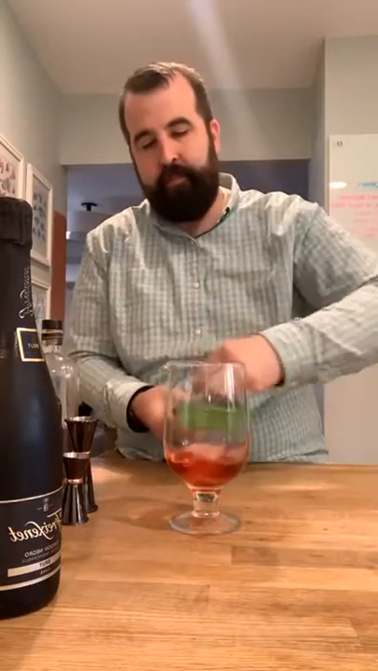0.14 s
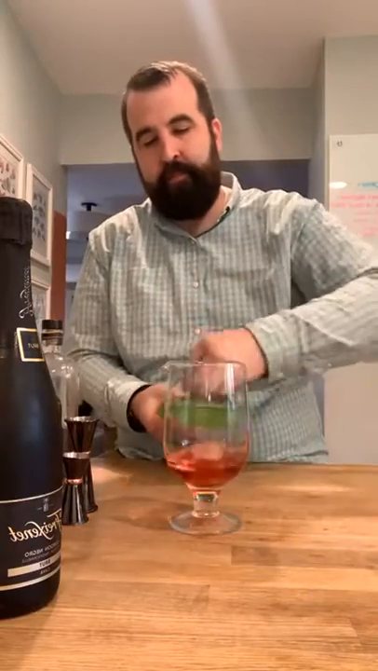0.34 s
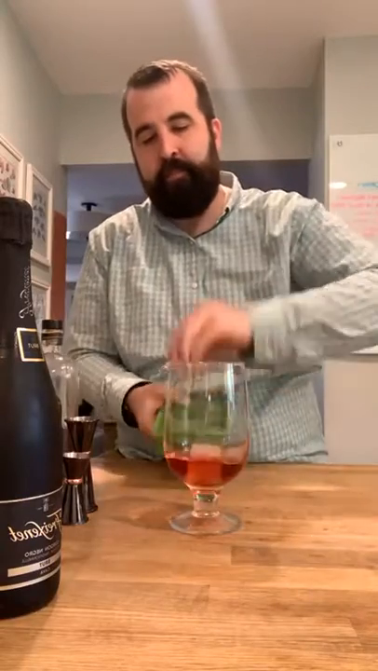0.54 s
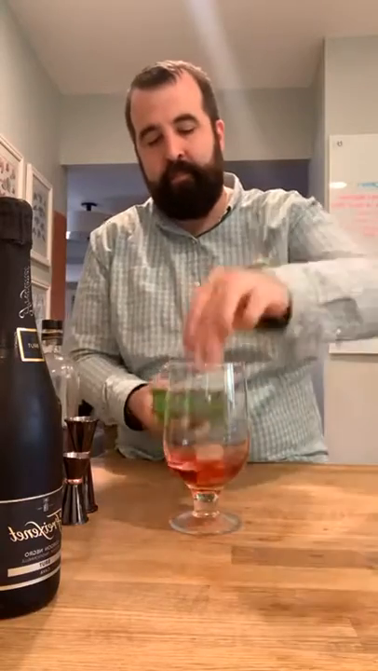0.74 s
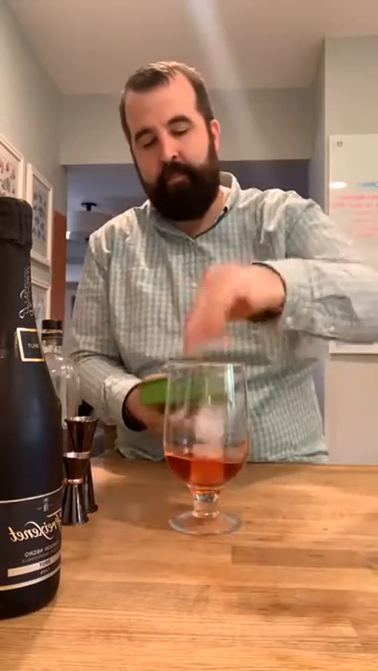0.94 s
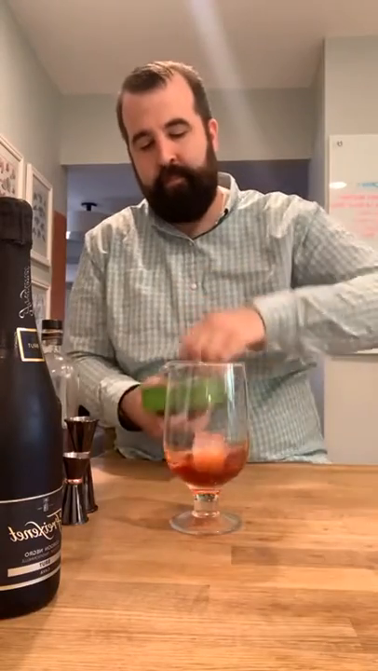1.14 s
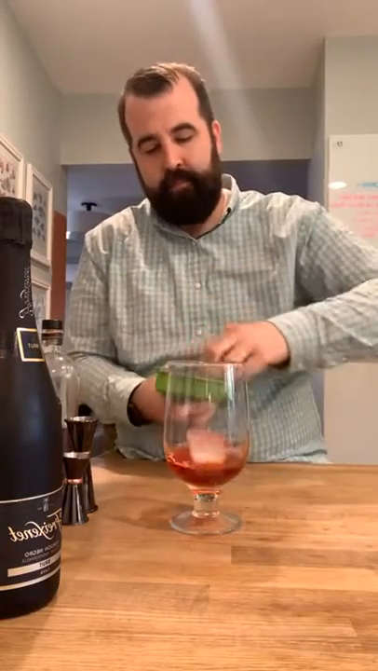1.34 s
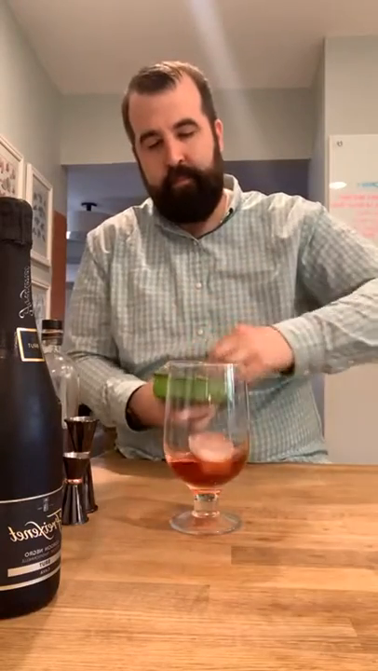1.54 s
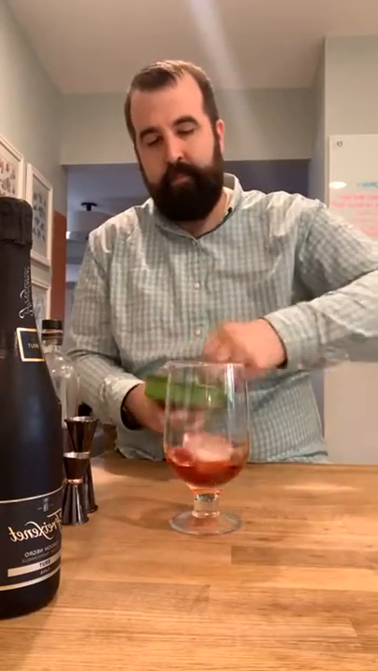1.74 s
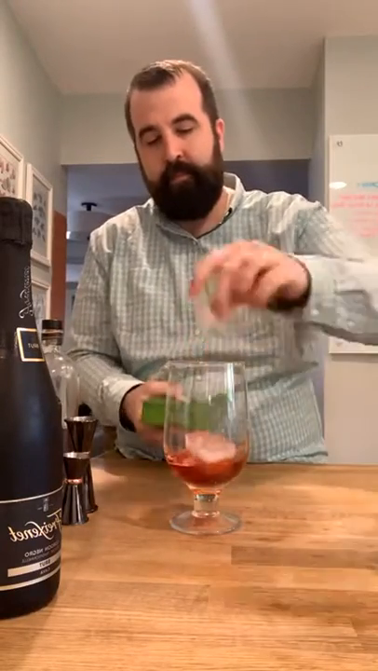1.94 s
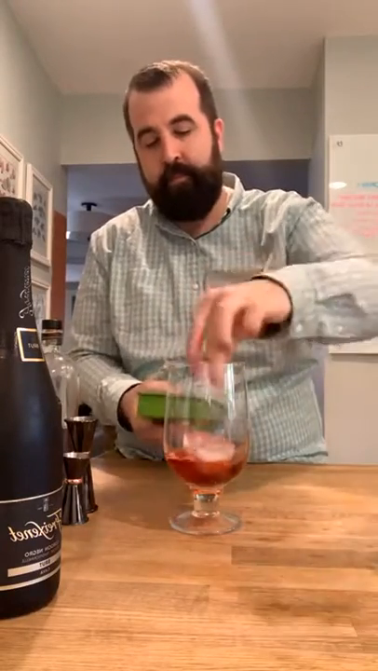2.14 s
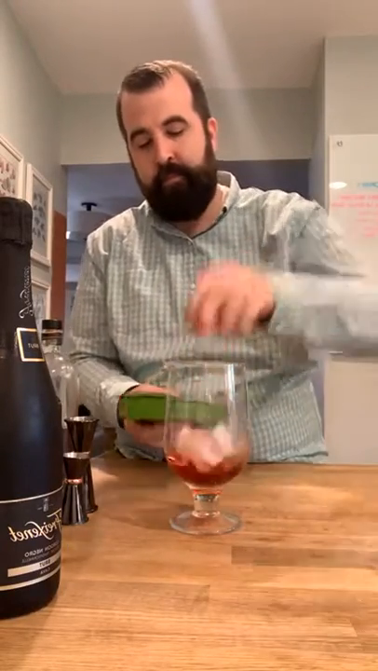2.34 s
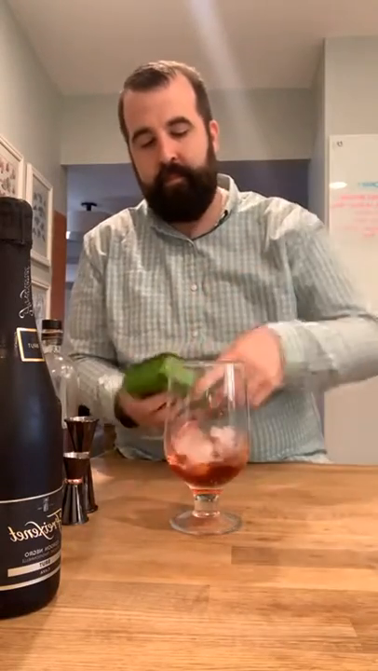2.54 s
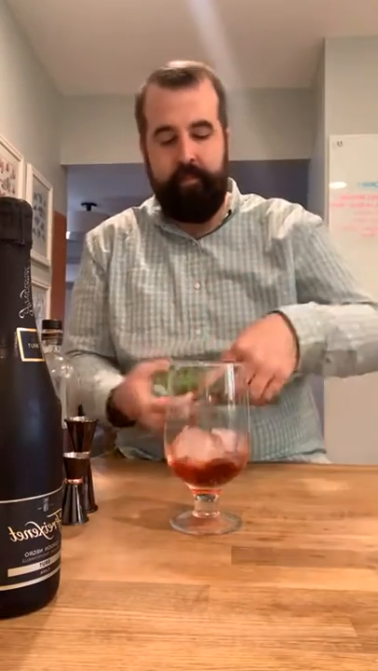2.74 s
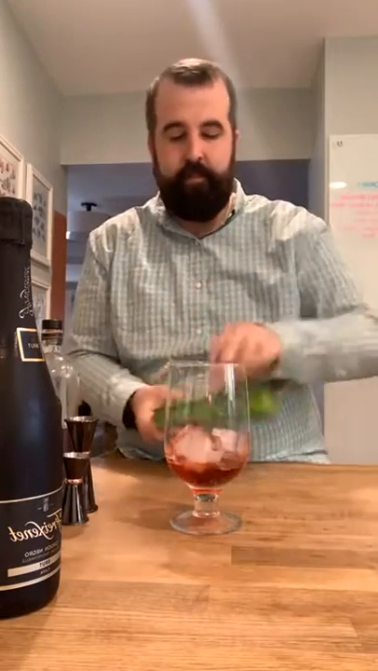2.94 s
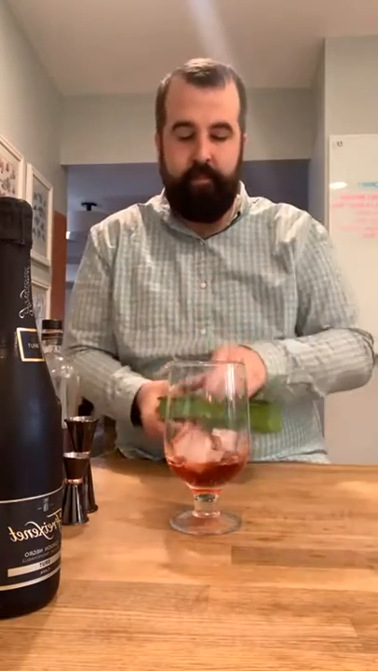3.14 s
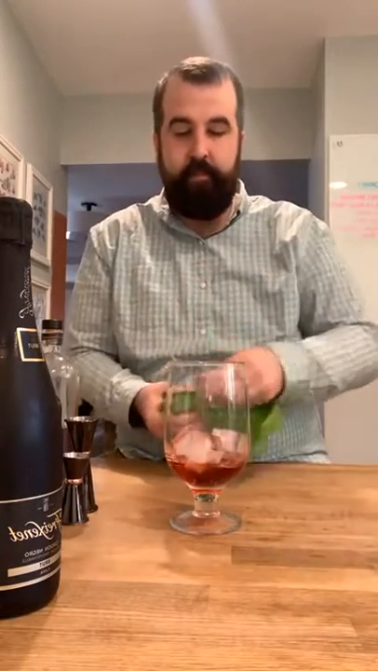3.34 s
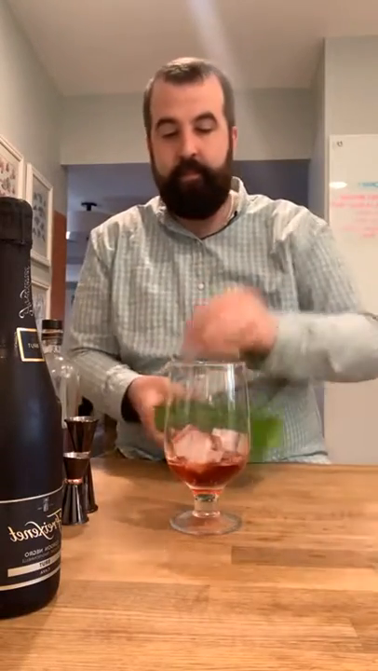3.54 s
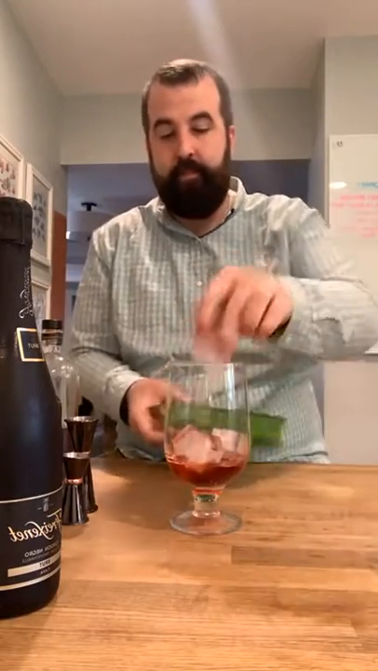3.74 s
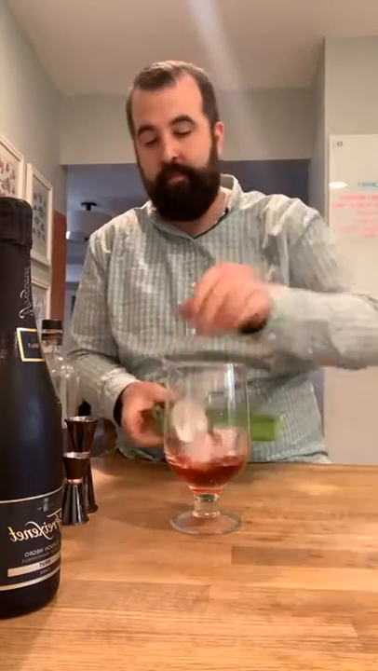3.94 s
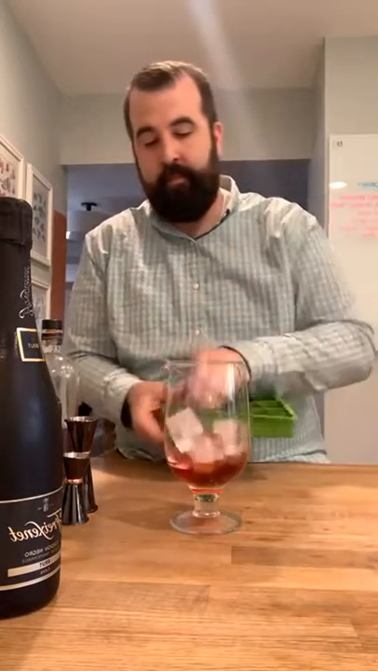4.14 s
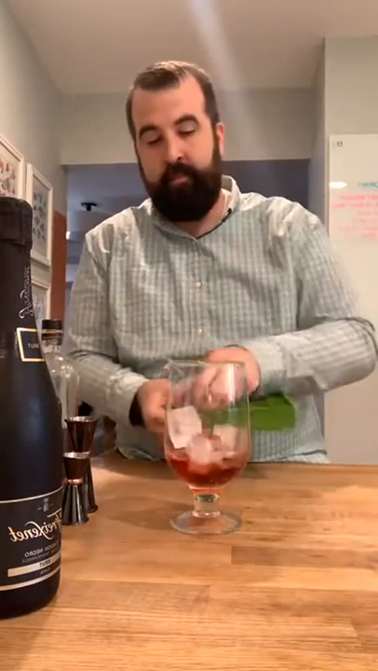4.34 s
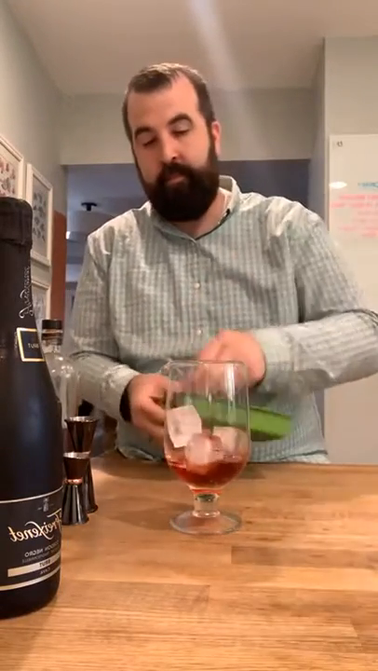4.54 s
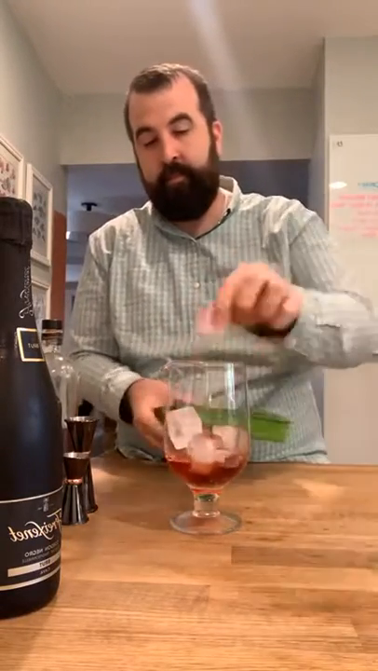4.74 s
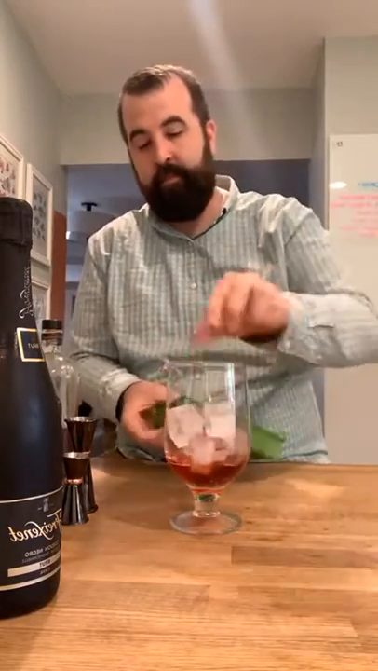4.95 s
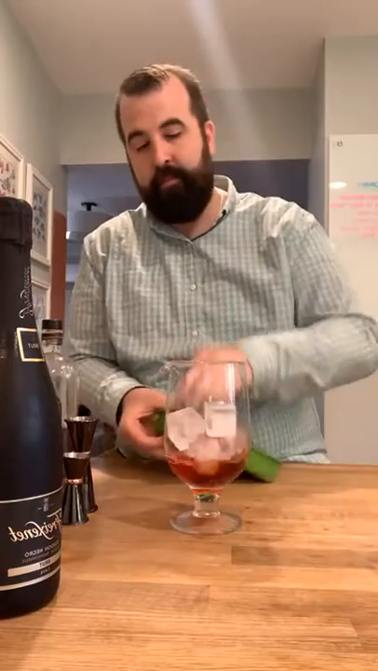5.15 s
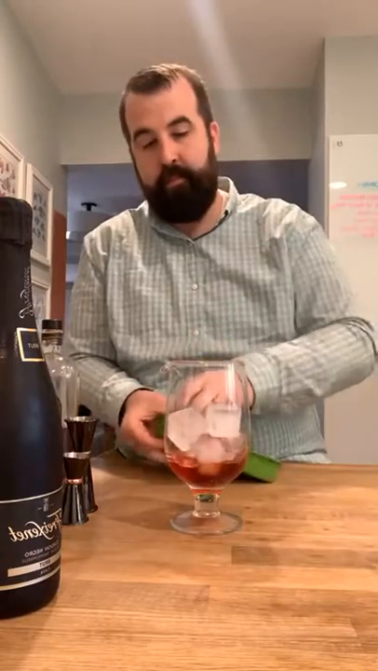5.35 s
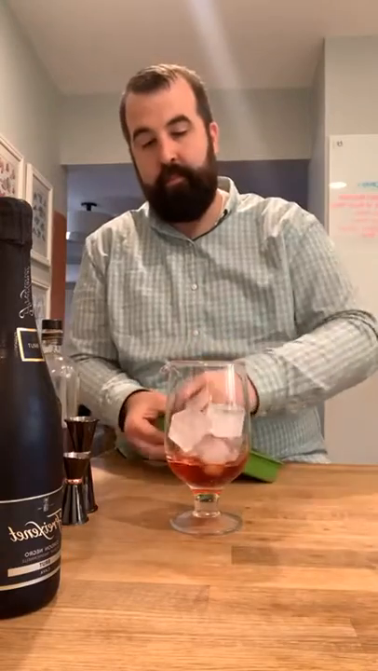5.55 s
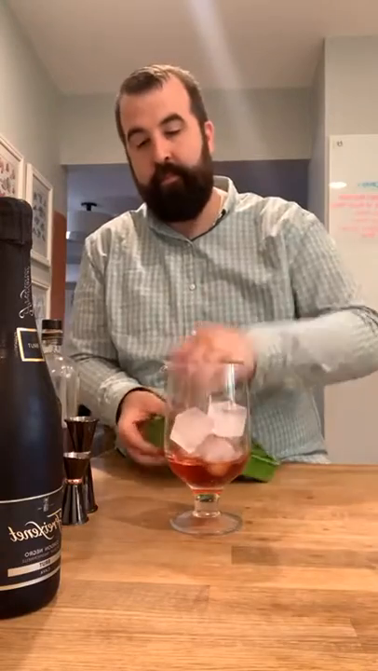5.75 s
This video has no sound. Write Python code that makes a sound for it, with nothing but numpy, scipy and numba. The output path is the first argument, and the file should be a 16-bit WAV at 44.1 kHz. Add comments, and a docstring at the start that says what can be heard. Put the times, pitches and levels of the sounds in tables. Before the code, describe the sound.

A rubber ice tray gives a few soft snaps, the sharpest at about 0.4 seconds. From 0.7 to 1.1 seconds an ice cube drops into a nearby stemmed glass with a little drink in it, knocking several times and making the bowl ring. Quiet finger rubs and tray pops follow until 1.8 seconds. A second cube clinks and rattles brightly from 2.1 to 2.5 seconds, with a small knock near 2.75. Fingers rub the tray faintly from 3 to 3.6 seconds. A third cube clatters against the glass and the other ice from 3.9 to 4.3 seconds, and a fourth lands with sharp clacks around 4.9. The ringing gets shorter as the glass fills. After a soft rub at 5.3 seconds, tray snaps and bright ticks of settling ice come at 5.5 and 5.8. The small kitchen has a short echo and a faint, steady hum.

```python
"""Ice cubes clink, one by one, into a stemmed glass with a little drink in it.
Each cube knocks the wall and the other cubes a few times. The bowl of the glass rings,
and the ringing gets shorter as it fills. In between, fingers rub and snap a rubber tray
to push the cubes out. A small kitchen echoes and hums."""
import sys
import numpy as np
from scipy import signal
from scipy.fft import rfft, irfft
from scipy.io import wavfile
from numba import njit

SR = 44100
rng = np.random.default_rng(int(sys.argv[2]) if len(sys.argv) > 2 else 0)


def unload_wav(signal):
    """Save mono or channel-first audio to the path in sys.argv[1] as 16-bit WAV at rate SR, clipped to [-1, 1]."""
    wavfile.write(
        sys.argv[1],
        SR,
        np.round(np.clip(np.atleast_2d(signal).T, -1, 1) * 32767).astype(np.int16),
    )


N = 259479

# A cube hits the glass. The angle is its place in the second ring's pattern around the wall.
# start_s, thud_db, clack_db, first_ring_db, second_ring_db, higher_rings_db, angle_rad
HITS = [(.001, -59, -60, -64, -74, -91, 1), (.7077, -29.5, -48, -38, -53, -39.5, 0.95),
        (.7347, -26.5, -43, -68, -65, -71, 0.42), (.864, -13.5, -24, -33, -68, -47, .6),
        (0.8946, -26, -19.5, -45.5, -49.5, -20, -.6), (.909, -27, -33, -29, -27.5, -45, -.785),
        (1.0594, -33.5, -35, -41, -52, -49.5, .9), (2.1374, -39.5, -56, -71, -69, -84, 0.88),
        (2.1655, -31.5, -26, -30.5, -19.5, -21, -0.28), (2.1944, -19.5, -15.5, -32, -50, -30, 0.91),
        (2.2029, -28.5, -40.5, -21, -23.5, -17.5, 1), (2.2344, -43, -58, -51, -21.5, -32.5, 0.87),
        (2.2794, -28.5, -26, -68, -35, -41, 1), (2.3865, -34, -23, -43.5, -52, -47, 0.95),
        (2.4044, -29, -42.5, -57, -56, -40, -0.43), (2.4394, -34.5, -36, -44, -40.5, -62, -0.089),
        (2.7354, -37.5, -44, -61, -73, -71, .7), (2.7611, -36.5, -32.5, -45.5, -50, -53, .9),
        (3.8641, -19, -15.5, -32, -25, -27, 0.11), (3.8824, -22, -17.5, -56, -47, -30, -0.32),
        (3.9185, -32.5, -28.5, -41, -40, -30.5, 0.76), (3.9913, -24.5, -18.5, -34.5, -36, -19, 0.3),
        (4.0444, -29.5, -28.5, -34, -64, -27.5, 1), (4.1235, -39, -30.5, -54, -45, -43, 1),
        (4.1909, -32, -30.5, -38.5, -34.5, -35, -0.43), (4.2994, -38.5, -45, -46, -56, -47.5, 1),
        (4.4418, -53, -51.5, -57.5, -76, -77, 0.3), (4.4764, -49.5, -43.5, -83.5, -67, -54.5, .8),
        (4.8504, -22.5, -23.5, -39, -56, -30.5, .6), (4.8698, -18.5, -13.5, -31, -34, -22.5, .9),
        (4.8908, -54, -38.5, -24, -31, -15, 1), (4.9114, -43, -31.5, -59, -60, -19, .8),
        (4.9444, -31.5, -40, -68, -55, -45, .9), (5.0294, -33.5, -34, -75, -50, -44, 0.87)]
# The bowl's tones. An uneven wall splits rings 0-2 into pairs that waver; 3 means all upper tones.
# ring_number, pitch_hz, level_db, fade_s (time to fall 60 dB, before damping)
BOWL_TONES = [(0, 872.5, -1, .62), (0, 878, 0, .62), (1, 1922, 2, 1.05), (1, 1938.3, 2, 1.05),
              (2, 3482, 0, .46), (2, 3500, -11, .3), (3, 5078, -10, .2), (3, 5437, -11, .2),
              (3, 5706, -3, .22), (3, 5766, -4, .2), (3, 6702, -12, .2), (3, 6828, -4, .18),
              (3, 7600, -9, .15), (3, 8660, -16, .12), (3, 8880, -19, .12), (3, 10300, -24, .08),
              (3, 11200, -24, .08), (3, 13720, -21, .08), (3, 14100, -22, .08)]
# Ice resting on the wall; a bigger factor stops the ringing sooner. time_s, damping_factor
ICE_DAMPING = [(0, 0.21), (.7, 4.4), (.9, 1.05), (2.1, .95), (2.2, 2.2), (2.7, 2.55), (3.8, 3.5),
               (5.9, 5.3)]
# The air in the bowl, the stem and the counter. pitch_hz, level_db, fade_s
THUD_TONES = [(146.4, -3.5, 0.053), (272, -4.5, 0.037), (349.6, -4, 0.12), (505, 7.5, 0.011),
              (606, -1, 0.058), (668, 0.5, 0.029)]
# The cubes' own tones. pitch_hz, level_db, fade_s
CUBE_TONES = [(1290, 6, 0.0028), (1666, -9, 0.0067), (1705, -0.5, 0.024), (2040, -2.5, 0.011),
              (2713, -4, 0.0083), (3070, -7.5, 0.0099), (4000, -4, 0.0063)]
# Single notes from square hits. start_s, level_db, pitch_hz, fade_s
HIT_NOTES = [(0.864, -27, 1290, 0.071), (.8645, -16, 593.6, 0.078), (2.1656, -19.5, 5100, 0.45),
             (2.762, -44.5, 1730, 0.3), (3.8631, -15.5, 1732, 0.19), (3.8641, -16, 668, 0.085),
             (4.4759, -50.5, 1660, 0.11), (4.8714, -31, 1570, 0.19), (4.872, -10.5, 3850, .03),
             (4.8914, -10, 3150, .04), (5.0282, -32, 1628, 0.037)]
# The tray snaps. start_s, pop_db, pop_pitch_hz, dull_db, bright_db, bright_pitch_hz
TRAY_SNAPS = [(0.027, -38.5, 1530, -42, -43.5, 3800), (0.2083, -40, 1310, -43, -47, 3500),
              (.3112, -43, 1490, -45, -53, 4000), (.351, -36, 1100, -40, -49, 5200),
              (.3909, -21.5, 1410, -42, -25, 5970), (0.623, -38, 1894, -45, -67, 5230),
              (1.2735, -32.5, 1330, -50, -41, 4100), (1.4847, -35.5, 1860, -39.5, -41.5, 4530),
              (1.6102, -72, 1420, -45, -45.5, 3900), (1.6413, -72.5, 1510, -47, -39, 5130),
              (1.7999, -28, 1743, -49, -57, 5550), (3.047, -54.5, 1560, -38.5, -51, 5200),
              (5.5118, -33, 1890, -30.5, -46, 3820), (5.6119, -37, 1630, -65.5, -66, 3900),
              (5.8177, -51, 1654, -49.5, -59, 3680)]
# Finger strokes on the tray. peak_s, swell_s, fade_s, low_db, high_db
RUB_STROKES = [(.005, 0.012, 0.051, -54, -72), (1.118, .035, 0.089, -51, -43.5),
               (3.05, 0.042, 0.017, -51, -71.5), (3.115, 0.11, 0.11, -53, -46.5),
               (3.33, 0.26, 0.16, -60, -78), (3.575, 0.018, 0.091, -67, -77),
               (3.25, 0.024, 0.023, -55.5, -64), (5.227, 0.012, 0.045, -49, -57.5),
               (5.284, 0.1, 0.13, -53.5, -48.5)]
# The low part of the rubbing noise. pitch_hz, level_db
RUB_LOW_SPECTRUM = [(250, -12), (500, -13), (1000, -1.5), (1500, -2), (2000, -5.5), (2500, -16.5),
                    (4000, -39)]
# The high part of the rubbing noise. pitch_hz, level_db
RUB_HIGH_SPECTRUM = [(2200, -15), (3000, -5), (3800, -3), (4700, 3.5), (5800, -5), (8000, -8), (9500, -18),
                     (12000, -26.5), (15000, -19.5)]
# Ice settles. start_s, level_db
ICE_TICKS = [(1.492, -34), (5.5124, -18), (5.8197, -31)]
# How long the kitchen echoes. pitch_hz, fade_s
ECHO_FADES = [(100, 0.48), (400, 0.45), (1500, 0.38), (5000, 0.36), (15000, 0.18)]
# The kitchen's steady noise. pitch_hz, level_db
HUM_SPECTRUM = [(12, -27.5), (20, -13), (65, 4), (314, -11.5), (372, -10.5), (794, -15.5), (1900, -17.5),
                (2580, -20.5), (5670, -25), (10500, -41.5), (15200, -35), (16500, -62.5)]

CRACK_DB, CRACK_GROWTH = -19, 2.3   # growth: dB of crack per dB given to the higher rings
RUB_FADE_DB, RUB_UNEVEN_DB, RUB_CATCHES_PER_S = 32, 3.5, 43
DRINK_DAMPING = 1.9   # the drink damps the upper tones at least this much
CUTOFF_HZ = 17150


def bowl_rings(rattle):
    """Each hit makes the glass wall ring; returns the three low rings and the upper tones."""
    start_s, _, _, *ring_db, angle_rad = np.transpose(HITS)
    damping = np.interp(np.arange(N) / SR, *np.transpose(ICE_DAMPING))
    upper_damping = np.maximum(damping ** 1.3, DRINK_DAMPING)
    luck_db = rng.normal(0, 1.5, (len(HITS), len(BOWL_TONES)))
    low, upper = 0, 0
    for k, (ring, hz, db, fade_s) in enumerate(BOWL_TONES):
        if ring < 3:
            force = clicks(start_s, ring_db[ring])
            low_damping = np.maximum(damping, .3)
            if ring == 1:   # where the cube lands decides which tone of the pair gets more
                force[(start_s * SR).astype(int)] *= np.cos(angle_rad) if k % 2 else np.sin(angle_rad)
            if ring == 2:
                force += amp(-1.5) * rattle
                low_damping **= 1.067
            low += amp(db) * tone(force, hz, fade_s, low_damping)
        else:   # short waves feel the roughness of each contact
            force = chatter(clicks(start_s, ring_db[2] + luck_db[:, k]), .0024) + amp(-7.5) * rattle
            upper += amp(db) * tone(force, hz, fade_s, upper_damping)
    return low, upper


def cube_knocks(rattle):
    """The bowl and counter thud, the cubes clack, and hard hits add a sharp crack."""
    start_s, thud_db, clack_db, _, _, higher_db, _ = np.transpose(HITS)
    push = chatter(clicks(start_s, thud_db), .0085)
    luck_db = rng.normal(0, 2, (len(HITS), len(CUBE_TONES)))   # each hit favours other tones
    thud, clack = 0, 0
    for k, (hz, db, fade_s) in enumerate(THUD_TONES):
        thud += (-1) ** k * amp(db) * tone(push, hz, fade_s)   # every other tone starts the opposite way
    for k, (hz, db, fade_s) in enumerate(CUBE_TONES):
        contact = chatter(clicks(start_s, clack_db + luck_db[:, k]), .0078, share=.05)
        clack += (-1) ** k * amp(db) * tone(contact + amp(3.5) * rattle, hz, fade_s)
    crack_db = CRACK_DB + CRACK_GROWTH * (higher_db + 19.5)
    crack = chatter(clicks(start_s, crack_db), .008) + amp(-4.5) * rattle
    return band(thud, 80, 1200) + band(clack, 470, 3700) + band(crack, 1700, 14000)


def hit_notes():
    """Hit squarely, a cube, the wall or the air in the bowl sounds one note of its own."""
    out = 0
    for start_s, db, hz, fade_s in HIT_NOTES:
        soft_click = signal.lfilter([.2], [1, -.8], clicks([start_s], db))
        out += tone(soft_click, hz, fade_s)
    return out


def cube_rattle():
    """The cubes keep jostling after each hit, giving tiny scattered pushes."""
    start_s, _, clack_db, *_ = np.transpose(HITS)
    return chatter(clicks(start_s, clack_db - 15), .066, share=.014)


def tray_snaps():
    """Rubber and ice let go of each other: a dull knock, a hollow pop and a bright tick."""
    start_s, pop_db, pop_hz, dull_db, bright_db, bright_hz = np.transpose(TRAY_SNAPS)
    push = chatter(clicks(start_s, dull_db), .0057)
    shake = chatter(clicks(start_s, 0), .0022)
    out = band(tone(push, 400, .012) - tone(push, 680, .0083), 200, 1200)
    for k, start in enumerate((start_s * SR).astype(int)):
        span = slice(start, start + 2000)
        pop = band(tone(shake[span], pop_hz[k], fade_s=.0065), 450, 3700)
        tick = tone(shake[span], bright_hz[k], fade_s=.0028)
        out[span] += amp(pop_db[k]) * pop + amp(bright_db[k]) * tick
    return out


def finger_rubs():
    """Skin slides on rubber in many tiny, uneven slips; each stroke swells and fades."""
    t, out = np.arange(N) / SR, np.zeros(N)
    slips = rng.standard_normal((2, N)) * amp(4.8 * np.minimum(rng.exponential(1, (2, N)), 4))
    low, high = shaped(slips[0], RUB_LOW_SPECTRUM), shaped(slips[1], RUB_HIGH_SPECTRUM)
    grip = np.interp(t * RUB_CATCHES_PER_S, np.arange(N // 100), rng.standard_normal(N // 100))
    low *= amp(RUB_UNEVEN_DB * grip)   # the skin catches and lets go
    for peak_s, swell_s, fade_s, low_db, high_db in RUB_STROKES:
        from_peak = np.where(t < peak_s, (peak_s - t) / swell_s, (t - peak_s) / fade_s)
        out += amp(-RUB_FADE_DB * from_peak ** .96) * (amp(low_db) * low + amp(high_db) * high)
    return out


def settling_ticks():
    """Settling ice makes bright ticks, too near and small to raise an echo."""
    start_s, db = np.transpose(ICE_TICKS)
    return band(chatter(clicks(start_s, db), .003), 2800, 5100)


def kitchen_echo(sound):
    """The walls throw sound back as a blur; each band of pitches dies away at its own speed."""
    t, echo = np.arange(SR) / SR, 0
    edges_hz = np.geomspace(60, 18000, 18)
    for low, high in zip(edges_hz, edges_hz[1:]):
        fade_s = at_hz(ECHO_FADES, np.sqrt(low * high))
        echo += band(rng.standard_normal(SR), low, high) * amp(-60 * t / fade_s)
    echo *= 1 - np.exp(-t / .00073)   # builds up over the first bounces
    return signal.fftconvolve(sound, echo / np.sqrt(np.sum(echo ** 2)))[:N]


def kitchen_hum():
    """Soft steady noise and a motor's low, wavering tone."""
    noise = shaped(rng.standard_normal(N), HUM_SPECTRUM)
    motor = unit_level(tone(rng.standard_normal(N), hz=55, fade_s=.42))
    return amp(-64) * noise + amp(-65.5) * motor


def clicks(times_s, db):
    """One click at each given time."""
    out = np.full(N, 1e-18)
    out[(np.asarray(times_s) * SR).astype(int)] = amp(db)
    return out


def chatter(force, decay_s, share=.3):
    """A rough contact: each click trails off in smaller ones, on a random share of the samples."""
    grains = rng.standard_normal(N) * (rng.random(N) < share)
    trail = signal.lfilter([1], [1, -np.exp(-1 / (decay_s * SR))], force)
    return .29 * force + grains * trail / np.sqrt(share * decay_s * SR)


def tone(force, hz, fade_s, damping=1):
    """A pushed object rings at one pitch, falling 60 dB in fade_s / damping seconds."""
    loss = np.log(1000) / (fade_s * SR) * damping * np.ones(len(force))
    return vibrate(force, 2 * np.pi * hz / SR, loss)


@njit
def vibrate(force, step_rad, loss):
    """Swing back and forth, losing a little motion each sample and taking in new pushes."""
    out, state = np.zeros(len(force)), 0j
    for i in range(len(force)):
        state = state * np.exp(1j * step_rad) * (1 - loss[i]) + force[i]
        out[i] = state.imag
    return out


def band(sound, low_hz, high_hz):
    """Keep mainly the pitches between two limits."""
    return signal.sosfilt(signal.butter(2, [low_hz, high_hz], "band", fs=SR, output="sos"), sound)


def shaped(noise, spectrum):
    """Make each pitch in a noise as strong as a table says, at an overall level of 1."""
    hz = np.maximum(np.fft.rfftfreq(N, 1 / SR), 1)
    return unit_level(irfft(rfft(noise) * amp(at_hz(spectrum, hz)), N))


def at_hz(table, hz):
    """Read between a table's rows, with octaves evenly spaced."""
    table_hz, values = np.transpose(table)
    return np.interp(np.log(hz), np.log(table_hz), values)


def unit_level(sound):
    """Scale to an average (rms) level of 1."""
    return sound / np.sqrt(np.mean(sound ** 2) + 1e-20)


def amp(db):
    """Turn decibels into a multiplier."""
    return 10 ** (np.asarray(db) / 20)


def scene():
    """The glass is near; the tray is behind it, so it echoes more. The hum lies under both."""
    rattle = cube_rattle()
    low_rings, upper_tones = bowl_rings(rattle)
    knocks = cube_knocks(rattle) + hit_notes()
    tray = tray_snaps() + finger_rubs()
    hum = kitchen_hum()
    # the long low rings are heard mostly without echo
    echo = kitchen_echo(amp(-13) * low_rings + upper_tones + knocks + amp(2) * tray)
    return (low_rings + upper_tones + knocks + tray + settling_ticks() + echo + hum)[None]


def record(dry):
    """Round off the loudest peaks and cut the very highest pitches."""
    rounded = 1.049 * np.tanh(dry / .83)
    return signal.sosfilt(signal.cheby2(12, 70, CUTOFF_HZ, fs=SR, output="sos"), rounded)


dry = scene()
out = record(dry)
unload_wav(out)
```